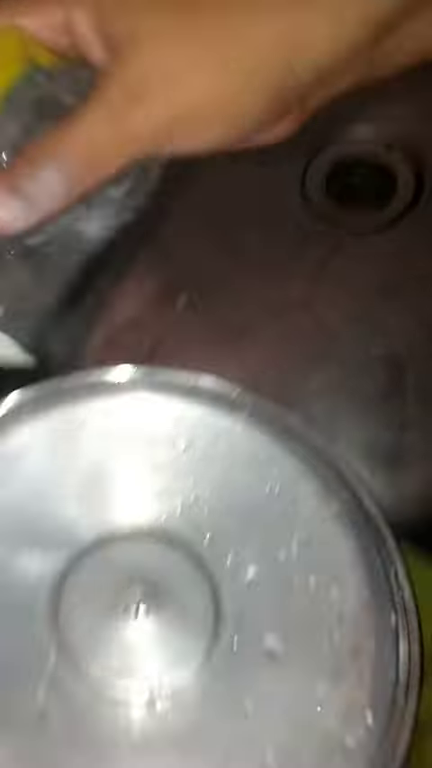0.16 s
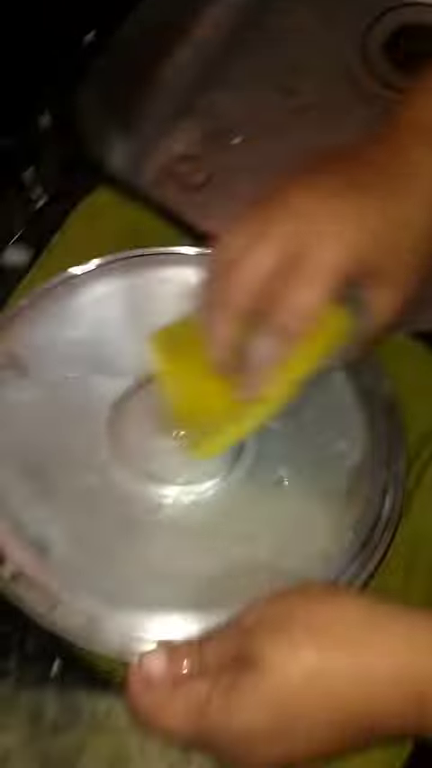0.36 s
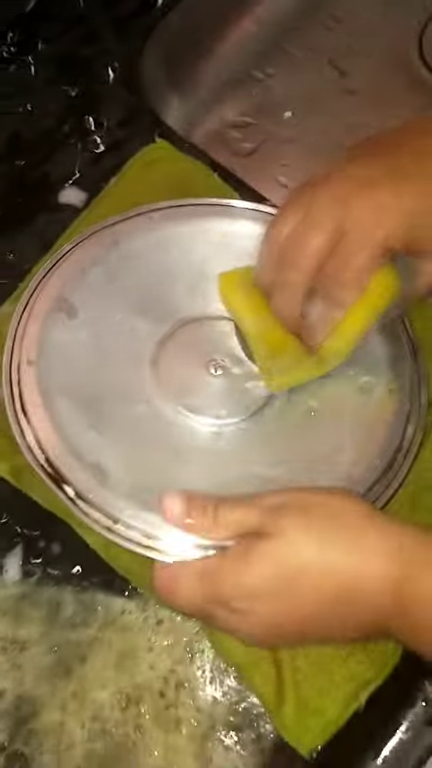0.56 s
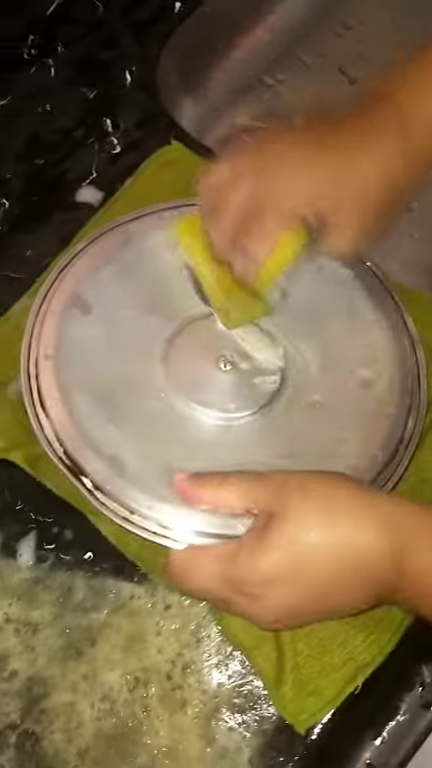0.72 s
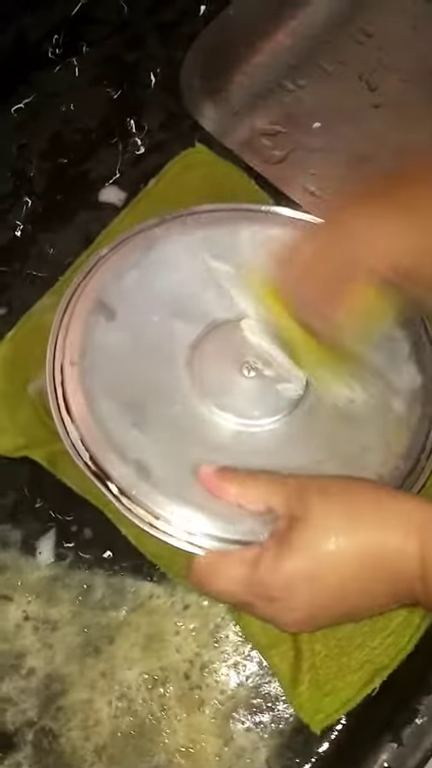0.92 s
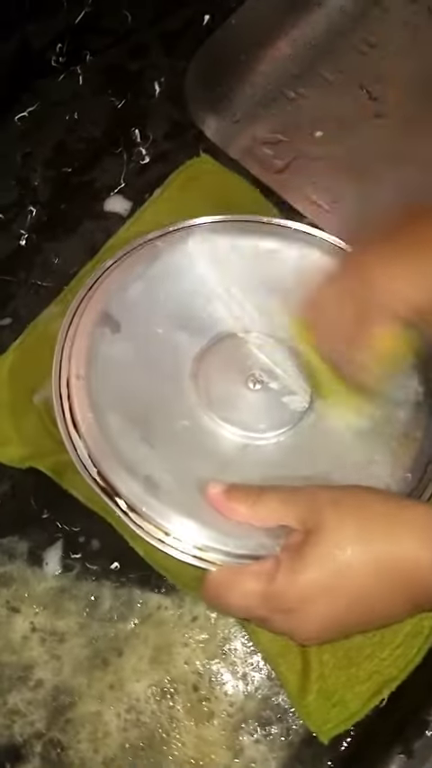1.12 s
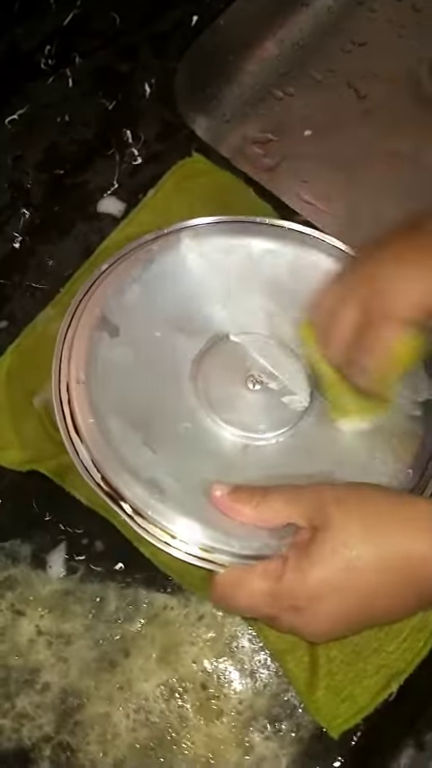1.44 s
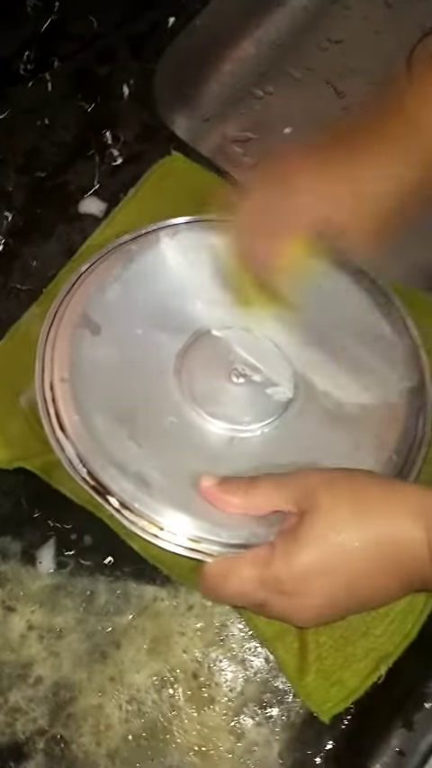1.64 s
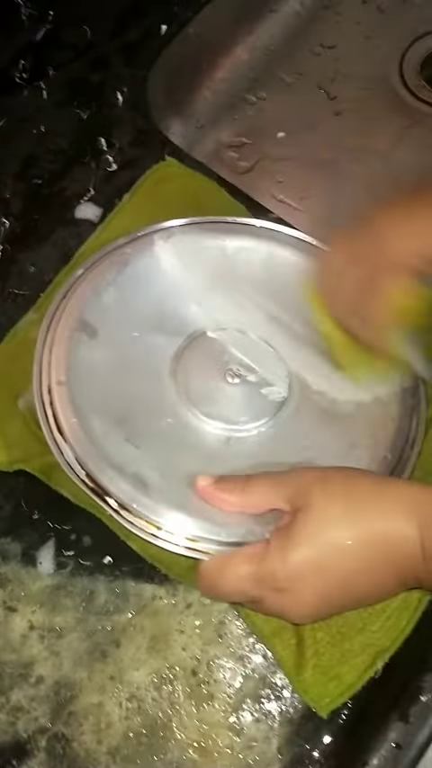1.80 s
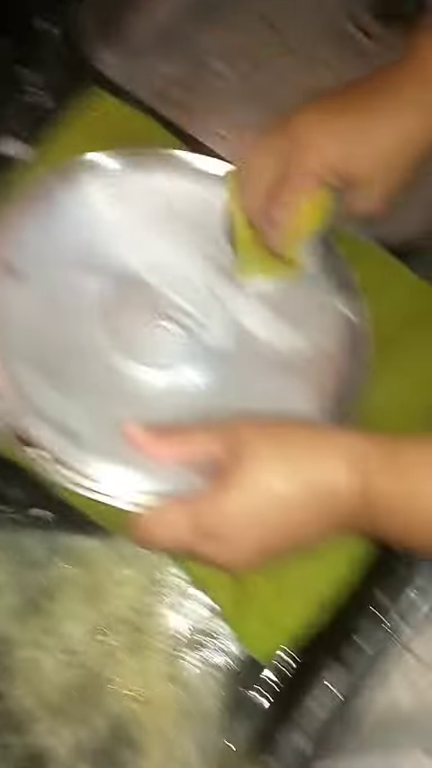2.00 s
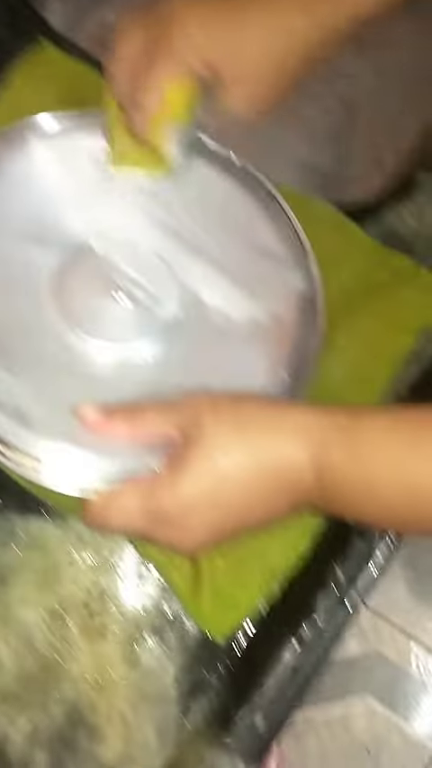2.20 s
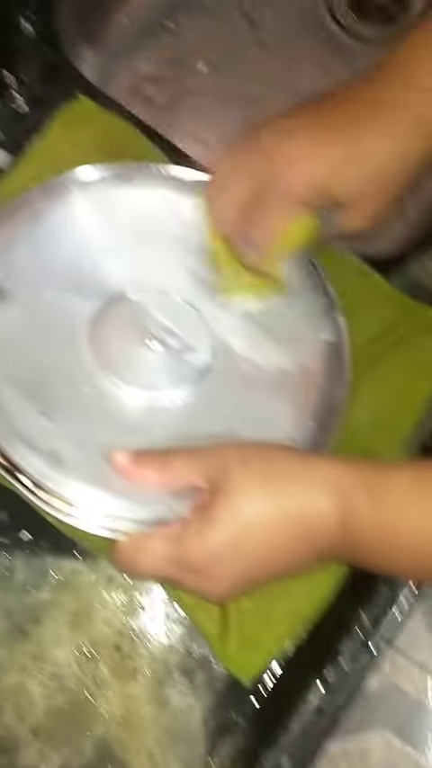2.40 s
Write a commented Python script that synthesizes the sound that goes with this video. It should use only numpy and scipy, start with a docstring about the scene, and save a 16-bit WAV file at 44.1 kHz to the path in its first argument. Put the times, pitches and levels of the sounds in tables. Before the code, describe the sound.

A gritty pad scrubs a metal pot lid in quick, even, hissing strokes, after faint first rubs, soft thuds and two sharp rim knocks; low kitchen rumble, close and dry, with dull treble.

```python
"""Scouring a pot lid

On a kitchen counter a sponge with paste scrubs a metal pot lid held on a cloth, in quick strokes back and forth.
Random clicks make the grit's hiss and ring the damped lid, which judders and knocks as it rocks.
Soft thuds sound as the lid is set down; the cloth drags with a hum and a rustle, over a low kitchen rumble.
Distance is level alone, without echoes; the narrow-band microphone loses the treble above 7.5 kHz."""
import sys
import numpy as np
from scipy import signal
from scipy.fft import rfft, irfft
from scipy.io import wavfile
from scipy.ndimage import uniform_filter1d

SR = 44100
rng = np.random.default_rng(int(sys.argv[2]) if len(sys.argv) > 2 else 0)


def unload_wav(signal):
    """Save mono or channel-first audio to the path in sys.argv[1] as 16-bit WAV at rate SR, clipped to [-1, 1]."""
    wavfile.write(
        sys.argv[1],
        SR,
        np.round(np.clip(np.atleast_2d(signal).T, -1, 1) * 32767).astype(np.int16),
    )


def ratio_of_db(decibels):
    """Turn decibels (scalar or array-like) into linear amplitude factors; 0 dB maps to 1."""
    return 10 ** (np.asarray(decibels, float) / 20)


N = 112454

# spectrum of the kitchen rumble and air: (f/Hz, relative density/dB)
ROOM_SPECTRUM = [(25, -45), (50, -21.5), (70, -9), (86, 1), (105, -7.5), (125, -2), (200, -6.5), (240, -17),
                 (400, -15), (700, -22), (1500, -24), (2500, -26), (6800, -33.5), (8200, -48)]
# rise and fall of the rumble over its base: (t/s, gain/dB)
ROOM_SWELL = [(0, 3.5), (.2, 1), (.4, 4.5), (1.1, 6), (2.1, 5), (2.55, 3.5)]
ROOM_BASE_DB = -70

# cloth dragging over the counter, with a wandering hum: (t/s, gain/dB, hum f/Hz)
CLOTH_DRAG = [(0, -98, 383), (.18, -80.5, 374), (.3, -68, 380), (.45, -61, 378), (.5, -64, 317),
              (0.551, -62, 412), (.61, -66, 315), (.68, -73.5, 331), (0.949, -63, 319), (1.1, -69.5, 319.6),
              (2.1, -72, 333), (2.55, -67, 361)]
# spectrum of the cloth's rustle: (f/Hz, relative density/dB)
RUSTLE_SPECTRUM = [(100, -21.5), (220, -6.5), (350, 3), (480, -1), (700, -26)]
HUM_WIDTH_HZ, HUM_DB = 64, -6

# thuds through cloth and counter: (start t/s, peak level/dB, push width/ms, share of the light thump 0-1)
COUNTER_THUDS = [(.3965, -40.5, 1.03, 0.85), (.502, -57, 1.2, 0.3), (.572, -35, 2.02, 0.15),
                 (.590, -59, 1.4, 0.1), (.603, -44.5, 2.2, 0.2), (.641, -50.5, 2.1, 0.07),
                 (.884, -46.5, 1.73, 0.3), (.955, -47.5, 1.2, 0.4)]
# counter modes: (f/Hz, relative level in a heavy thump/dB, in a light one/dB, t60/s)
COUNTER_MODES = [(159, -6.5, -12, 0.11), (175.4, 4.5, -12.5, 0.063), (228, -1.5, -6.5, 0.075),
                 (315, -12, 5, 0.088), (393, -14, 5.5, 0.2), (673, -25, -0.5, 0.097)]
COUNTER_LOWEST_HZ = 132  # little is radiated below

# lid modes: (f/Hz, relative level when rubbed/dB, when knocked/dB, t60/s before any choking)
LID_MODES = [(839, -10.5, 14.5, 0.084), (939.4, -0.5, 15, 0.079), (1026, -11.5, 14.5, 0.049),
             (1270, -19, -1.5, 0.03), (1263, -4, 6, 0.029), (1347, 5, -8.5, 0.055),
             (1325, 11.5, -35, 0.022), (1428, 6, -9.5, 0.054), (1525, -8.5, -22, 0.057),
             (1580, 1, -25.5, 0.0064), (1906, 0.5, -21, 0.031), (2076, 1.5, -27, 0.017),
             (2363, -8, -20, 0.064), (2968, -4.5, -8.5, 0.061), (3274, -7.5, -28.5, 0.03),
             (5680, -8.5, -12.5, 0.026)]
LID_LOWEST_HZ = 798  # little is radiated below
SETTLE_S, SETTLE_DB_PER_S = 0.0099, -1500  # a knocked lid settles on the cloth, which chokes its ring

# knocks of the rim: (start t/s, peak level/dB, contact width/ms, share of the rubbed colour 0-1)
RIM_KNOCKS = [(.397, -51, 0.83, .0), (.574, -46.5, 0.17, 0.16), (.8745, -25, 0.36, 0),
              (.884, -32.5, 0.25, 0.53), (.9545, -24.5, 0.28, 0.02), (.961, -39.5, 0.077, 0.3),
              (1.270, -40.5, 0.28, 0.33), (1.4245, -38.5, 0.27, 0.7), (1.544, -38, .3, 0.1),
              (1.989, -45, 0.43, 0.86), (2.045, -37.5, 0.31, 0.15), (2.056, -37, 0.32, 0.44),
              (2.0875, -49, 0.36, .8), (2.1035, -40.5, 0.23, 1), (2.437, -41.5, 0.17, .8)]
# judders, the lid rocking on the counter: (start t/s, length/s, level before edges/dB, share of knock colour 0-1)
LID_JUDDERS = [(0.51, 0.099, -79, 0), (0.666, 0.037, -56, 0.38), (0.846, 0.024, -57, 0.14),
               (0.896, 0.039, -51, 0.66), (0.97, 0.035, -45, 0.74), (1, 0.021, -50, 0.7),
               (1.021, 0.021, -42.5, 0.8), (1.043, 0.026, -45.5, 0.8), (1.104, 0.015, -43.5, 0.1),
               (1.11, 0.0099, -39.5, 0.98), (1.261, 0.032, -52, 0.33), (1.384, 0.028, -47, 0.99),
               (1.443, 0.066, -53.5, 0.2), (1.549, 0.034, -47.5, 1), (1.68, 0.047, -58.5, 1),
               (1.846, 0.017, -50, 0), (1.98, .04, -43.5, 0.75), (2.058, 0.028, -48.5, 0.8),
               (2.07, 0.082, -54.5, 0), (2.248, 0.066, -50, 0.3), (2.401, 0.048, -48, 0.02),
               (2.516, .04, -53.5, 0)]
JUDDER_PER_S, JUDDER_SPREAD_DB, JUDDER_EDGE_S = 2500, 2.5, 0.0068
# one light slide over the lid: (start t/s, length/s, level/dB)
LIGHT_SLIDE = (0.385, 0.27, -71)
SLIDE_LOWEST_HZ, SLIDE_HIGHEST_MODE_HZ = 2150, 4000
SLIPS_PER_S, SLIP_SPREAD_DB = 1500, -1.5

# strokes: (start t/s, end t/s, mid level/dB, change from middle to end/dB, lid ring relative to grit/dB)
SCRUB_STROKES = [(0.219, 0.374, -76.5, -1.5, -2.5), (0.387, 0.407, -67, 6.5, -1.5),
                 (0.444, 0.475, -64.5, -2, -3), (0.482, 0.63, -69.5, -1.5, 6.5),
                 (0.671, 0.826, -60.5, 0.5, -3.5), (0.852, 0.974, -55, -2, 0), (0.992, 1.132, -55, -0.5, 3),
                 (1.151, 1.286, -52, -2.5, -1), (1.296, 1.439, -53.5, -0.5, -1),
                 (1.443, 1.573, -51.5, 1, -2.5), (1.58, 1.735, -54.5, -0.5, -1),
                 (1.743, 1.875, -53.5, -2, -0.5), (1.868, 2.025, -53.5, 1.5, -1),
                 (2.032, 2.162, -52, 0.5, 3.5), (2.179, 2.318, -53.5, -1.5, -2.5),
                 (2.32, 2.442, -53, 1.5, 2), (2.455, 2.58, -53.5, 0.5, 0.5)]
RISE_S, FALL_S = 0.019, 0.008
LINGER_DB, LINGER_S = -4, 0.017  # the pad keeps touching at each turn
# spectrum of the grit's hiss: (f/Hz, relative density/dB)
GRIT_SPECTRUM = [(300, -24.5), (650, -18), (800, -11), (1500, -6), (2200, -8.5), (3300, -11.5), (3700, -8),
                 (4400, -11.5), (5300, -15.5), (6050, -10.5), (6700, -17), (7500, -16.5), (9000, -23)]
GRIT_PER_S, GRIT_SPREAD_DB, GRIT_PATCH_DB = 12000, 2, 2
TURN_DULL_DB, TREBLE_HZ = -3, 4000  # the slowing pad loses its treble at each turn

MIC_HISS_DB = -94.5
MIC_EDGE_HZ, MIC_EDGE_WIDTH_HZ = 7525, 2060  # the response falls by 60 dB over this width


def evened(x):
    """Scales to rms 1."""
    return x / np.sqrt(np.mean(x ** 2) + 1e-20)


def above(x, hz, order):
    """Steep high-pass."""
    return signal.sosfilt(signal.butter(order, hz, "high", fs=SR, output="sos"), x)


def coloured(x, spectrum):
    """Minimum-phase filter with the response given as (f/Hz, gain/dB)."""
    f, db = np.transpose(spectrum)
    hz = np.abs(np.fft.fftfreq(4096, 1 / SR))
    log_gain = np.interp(np.log(hz + 1), np.log(f + 1), db) * np.log(10) / 20
    # the Hilbert transform of the log gain is the phase
    response = np.exp(np.conj(signal.hilbert(log_gain)))
    taps = np.fft.ifft(response).real[:2048]
    return signal.oaconvolve(x, taps)[:N]


def clicks(per_s, spread_db):
    """Random clicks of random sign, rms 1; a positive spread makes a few large, a negative one a few faint."""
    size = ratio_of_db(spread_db * np.minimum(rng.exponential(1, N), 5))
    sign = rng.choice([-1., 1.], N)
    return evened(size * sign * (rng.random(N) < per_s / SR))


def ring(modes, lowest_hz, order):
    """Impulse response of decaying (f/Hz, level/dB, t60/s) modes, energy 1."""
    t = np.arange(8000) / SR
    h = sum(ratio_of_db(db - 60 * t / max(t60, .005)) * np.sin(2 * np.pi * hz * t) for hz, db, t60 in modes)
    h = above(h, lowest_hz, order)
    return h / np.linalg.norm(h)


def gate(start, length, edge_s):
    """Opens and closes linearly within the given span."""
    t = np.arange(N) / SR
    return np.clip(np.minimum(t - start, start + length - t) / edge_s, 0, 1)


def blows(rows, first, second):
    """Each blow is a soft push of its own length into a blend of two rings."""
    out = np.zeros(N + 9000)
    for start, peak_db, ms, share in rows:
        width = max(ms, .05)
        u = np.arange(0, 3 * width, 1000 / SR) / width - 1.5
        push = np.exp(-4 * u ** 2)  # the width lies between its 1/e points
        sound = np.convolve(push, (1 - share) * first + share * second)[:8000]
        at = round(start * SR)
        out[at:at + 8000] += ratio_of_db(peak_db) * sound / np.abs(sound).max()
    return out[:N]


def kitchen():
    """Low rumble and air of the room: coloured noise that swells slowly."""
    s, db = np.transpose(ROOM_SWELL)
    level = ratio_of_db(ROOM_BASE_DB + np.interp(np.arange(N) / SR, s, db))
    return level * evened(coloured(rng.standard_normal(N), ROOM_SPECTRUM))


def cloth():
    """Rubbing clicks of the dragged cloth excite a resonance of wandering pitch and a broader rustle."""
    s, db, hz = np.transpose(CLOTH_DRAG)
    t = np.arange(N) / SR
    rub = clicks(600, 2.25)
    turn = np.exp(2j * np.pi * np.cumsum(np.interp(t, s, hz)) / SR)
    r = np.exp(-np.pi * HUM_WIDTH_HZ / SR)
    # shift the hum's pitch to zero, smooth there, and shift back
    hum = (turn * signal.lfilter([1], [1, -2 * r, r * r], rub / turn)).real
    rustle = coloured(rub, RUSTLE_SPECTRUM)
    return ratio_of_db(np.interp(t, s, db)) * (ratio_of_db(HUM_DB) * evened(hum) + .5 * evened(rustle))


def thuds():
    """Soft pushes through the cloth ring the modes of the counter."""
    heavy = ring([(hz, db, t60) for hz, db, _, t60 in COUNTER_MODES], COUNTER_LOWEST_HZ, order=4)
    light = ring([(hz, db, t60) for hz, _, db, t60 in COUNTER_MODES], COUNTER_LOWEST_HZ, order=4)
    return blows(COUNTER_THUDS, heavy, light)


def slide():
    """A light slide rings only the lid modes between about 2 and 4 kHz."""
    start, length, db = LIGHT_SLIDE
    rub = ratio_of_db(db) * gate(start, length, RISE_S) * clicks(JUDDER_PER_S, JUDDER_SPREAD_DB)
    modes = [(hz, level, t60) for hz, level, _, t60 in LID_MODES if hz < SLIDE_HIGHEST_MODE_HZ]
    return signal.oaconvolve(rub, ring(modes, SLIDE_LOWEST_HZ, order=8))[:N]


def judders(knocked, rubbed):
    """Short bursts of clicks, shared by power between the knocked and the rubbed ring."""
    to_knocked, to_rubbed = np.zeros(N), np.zeros(N)
    for start, length, db, share in LID_JUDDERS:
        burst = ratio_of_db(db) * gate(start, length, JUDDER_EDGE_S)
        to_knocked += np.sqrt(share) * burst
        to_rubbed += np.sqrt(1 - share) * burst
    to_knocked *= clicks(JUDDER_PER_S, JUDDER_SPREAD_DB)
    to_rubbed *= clicks(JUDDER_PER_S, JUDDER_SPREAD_DB)
    return signal.oaconvolve(to_knocked, knocked)[:N] + signal.oaconvolve(to_rubbed, rubbed)[:N]


def lid(strength):
    """Slips, judders, knocks and a slide all ring the same damped lid."""
    rubbed = ring([(hz, db, t60) for hz, db, _, t60 in LID_MODES], LID_LOWEST_HZ, order=12)
    knocked = ring([(hz, db, t60) for hz, _, db, t60 in LID_MODES], LID_LOWEST_HZ, order=12)
    settled_s = np.maximum(np.arange(len(knocked)) / SR - SETTLE_S, 0)
    knocked = knocked * ratio_of_db(SETTLE_DB_PER_S * settled_s)
    slips = strength * clicks(SLIPS_PER_S, SLIP_SPREAD_DB)
    slipping = signal.oaconvolve(slips, rubbed)[:N]
    return slide() + judders(knocked, rubbed) + slipping + blows(RIM_KNOCKS, knocked, rubbed)


def hand():
    """Rubbing strength over time for the grit and for the lid's ring, and the pad's speed 0-1."""
    t = np.arange(N) / SR
    grit_strength, lid_strength, speed = np.zeros(N), np.zeros(N), np.zeros(N)
    for start, end, db, change_db, ring_db in SCRUB_STROKES:
        body = np.clip((t - start) / RISE_S, 0, 1) * np.clip((end - t) / FALL_S, 0, 1)
        outside_s = np.maximum(np.maximum(start - t, t - end), 0)
        linger = ratio_of_db(LINGER_DB) * np.exp(-outside_s / LINGER_S)
        along = np.clip(2 * (t - start) / (end - start) - 1, -1, 1)  # -1 at the start, 1 at the end
        shape = ratio_of_db(db + change_db * along) * np.maximum(body, linger)
        grit_strength = np.maximum(grit_strength, shape)
        lid_strength = np.maximum(lid_strength, shape * ratio_of_db(ring_db))
        speed = np.maximum(speed, body)
    return grit_strength, lid_strength, speed


def grit(strength, speed):
    """Dense abrasive clicks; narrow patches of the hiss brighten and fade at random."""
    hiss = coloured(clicks(GRIT_PER_S, GRIT_SPREAD_DB), GRIT_SPECTRUM)
    hz, t, z = signal.stft(hiss, SR, nperseg=512, noverlap=384)
    patches = uniform_filter1d(rng.standard_normal(z.shape), size=3, axis=0)  # over frequency
    patches = evened(uniform_filter1d(patches, size=16, axis=1))  # over time
    treble = np.clip(hz / TREBLE_HZ - .5, 0, 1)
    slowness = 1 - np.interp(t, np.arange(N) / SR, speed)
    gain_db = GRIT_PATCH_DB * patches + TURN_DULL_DB * np.outer(treble, slowness)
    hiss = signal.istft(z * ratio_of_db(gain_db), nperseg=512, noverlap=384)[1][:N]
    return strength * evened(hiss)


def scene():
    """All sources, one channel."""
    grit_strength, lid_strength, speed = hand()
    background = kitchen() + cloth() + thuds()
    return (background + lid(lid_strength) + grit(grit_strength, speed))[None]


def roll_off(x):
    """The treble ends steeply here."""
    return signal.sosfilt(signal.butter(12, 15650, fs=SR, output="sos"), x)


def record(dry):
    """Narrow-band microphone: a steep loss of treble, then faint white hiss."""
    size = N + 4096
    hz = np.fft.rfftfreq(size, 1 / SR)
    edge = ratio_of_db(-60 * np.clip((hz - MIC_EDGE_HZ) / MIC_EDGE_WIDTH_HZ, 0, 1.5))
    narrow = irfft(rfft(dry, size) * edge, size)[:, :N]
    mix = narrow + ratio_of_db(MIC_HISS_DB) * rng.standard_normal(dry.shape)
    return roll_off(mix)


dry = scene()
out = record(dry)
unload_wav(out)
```